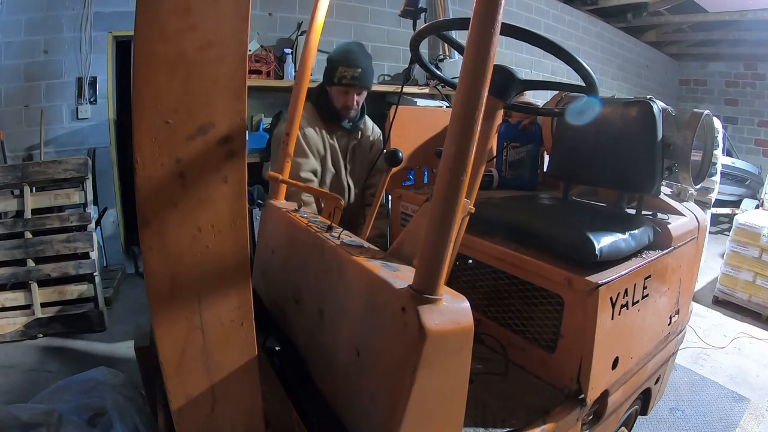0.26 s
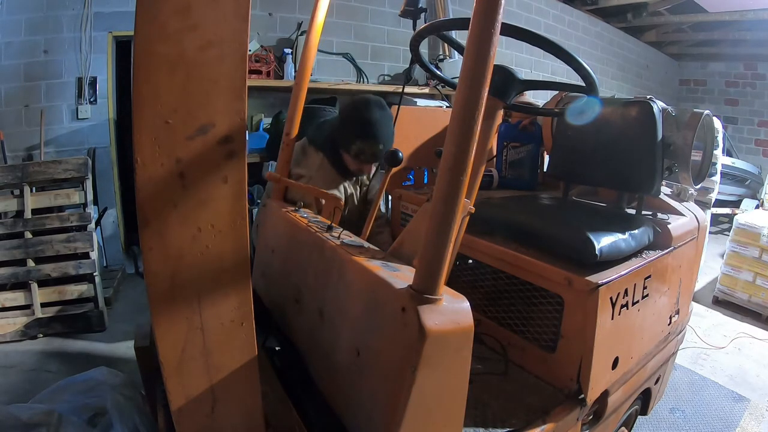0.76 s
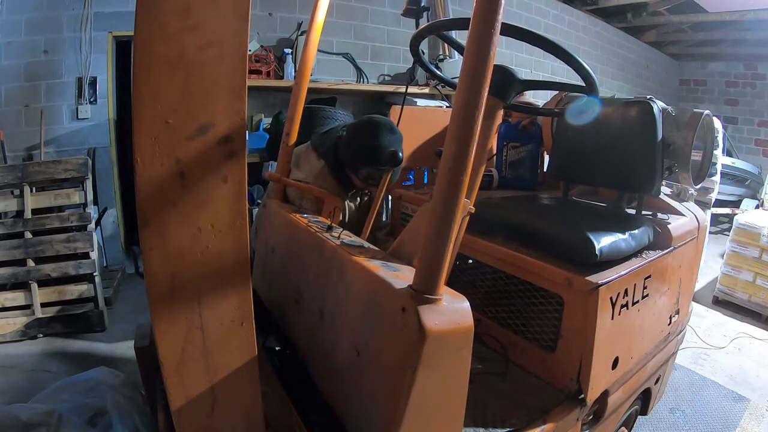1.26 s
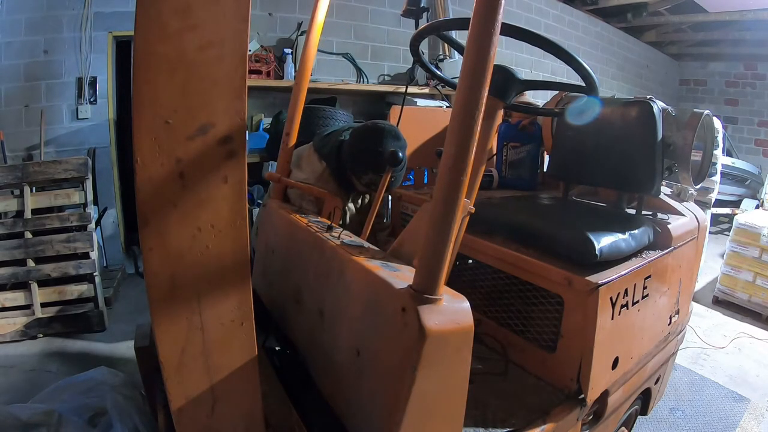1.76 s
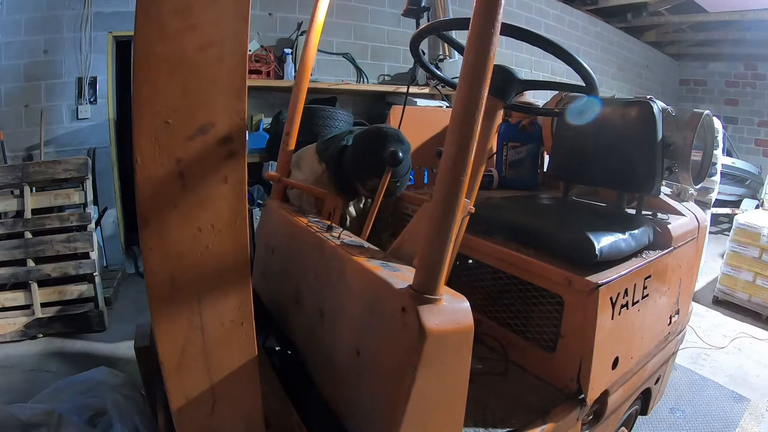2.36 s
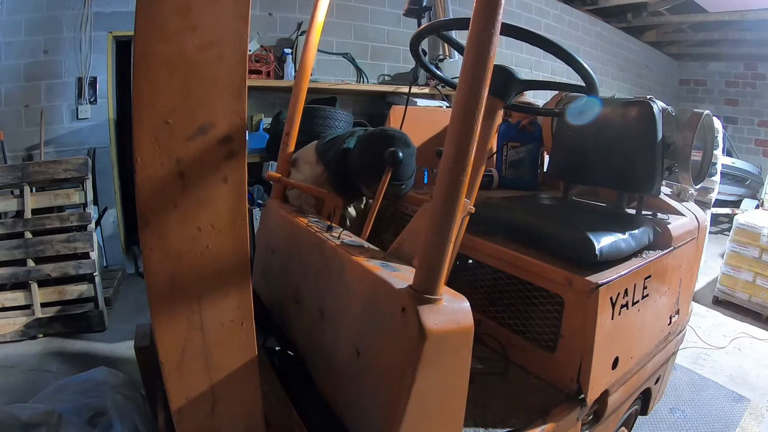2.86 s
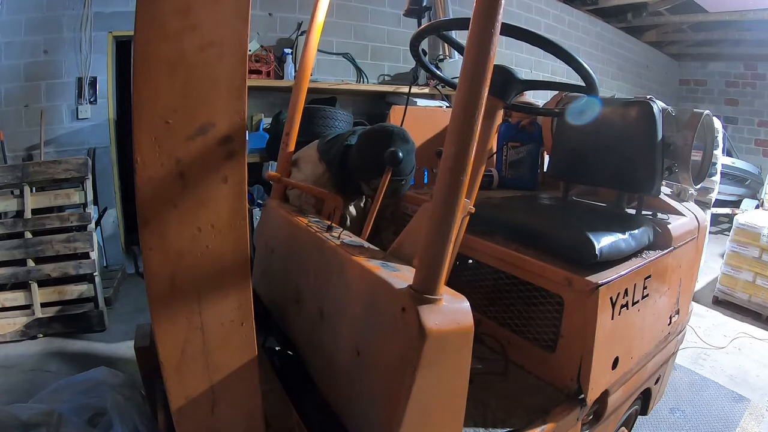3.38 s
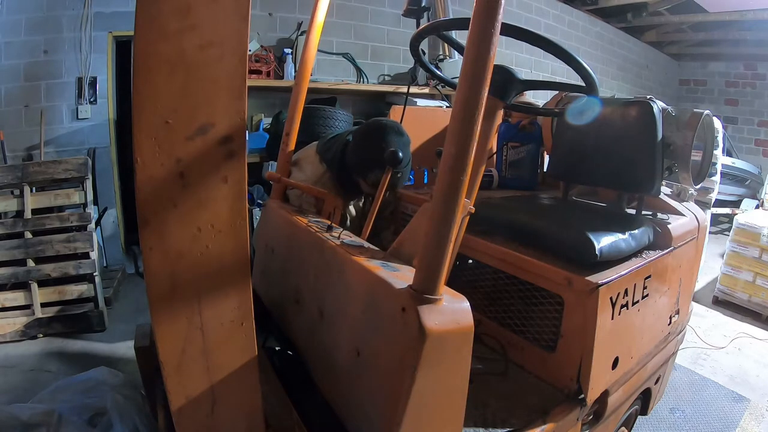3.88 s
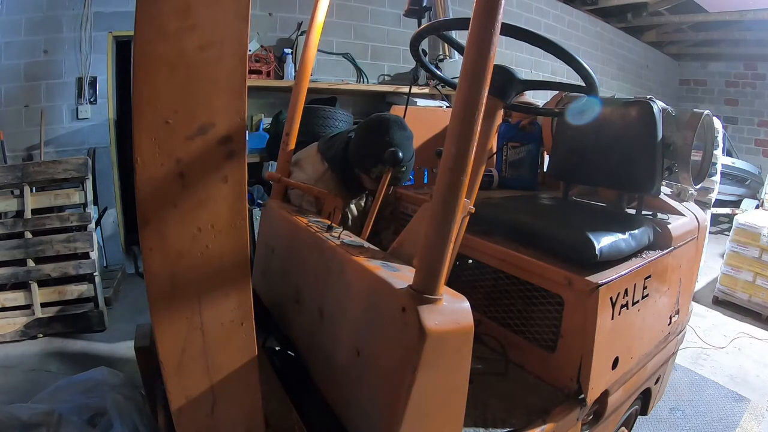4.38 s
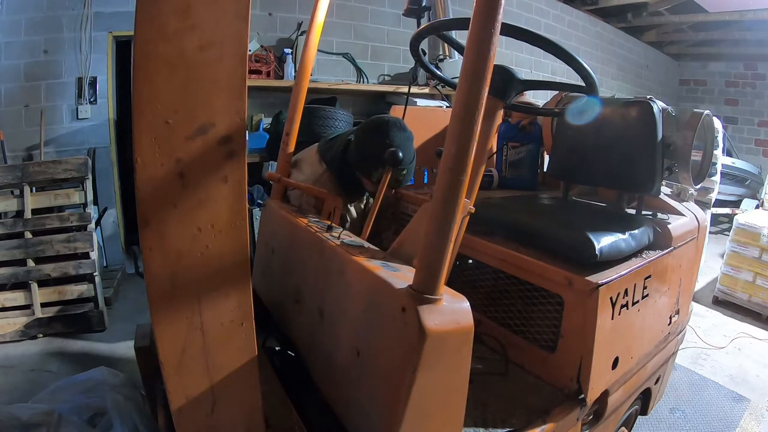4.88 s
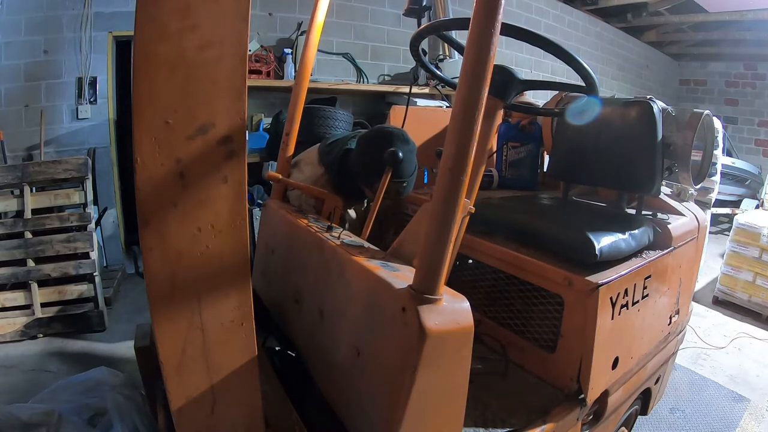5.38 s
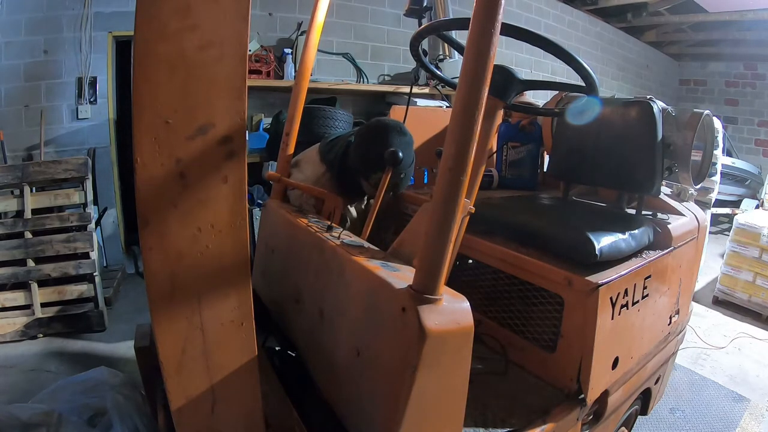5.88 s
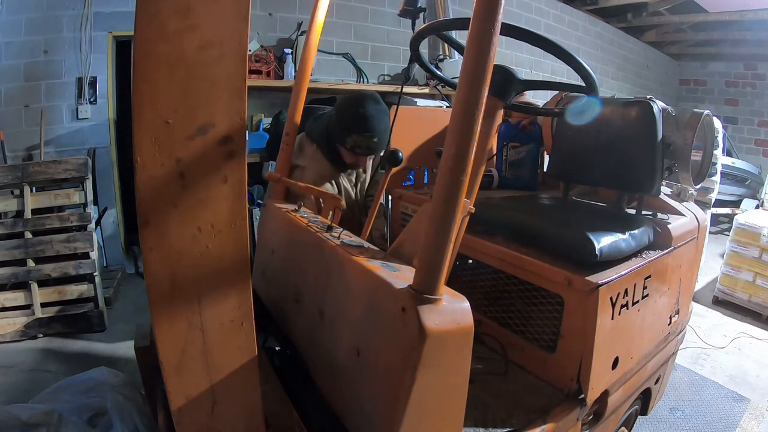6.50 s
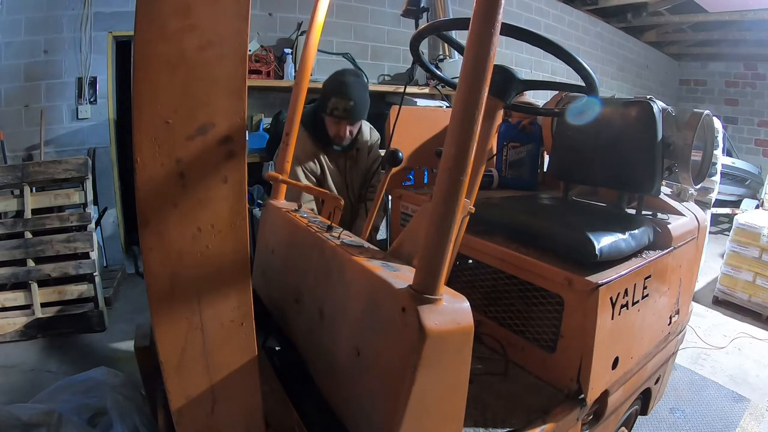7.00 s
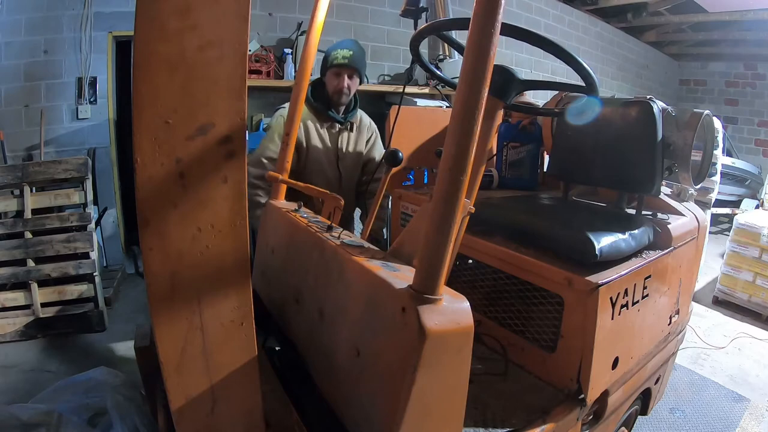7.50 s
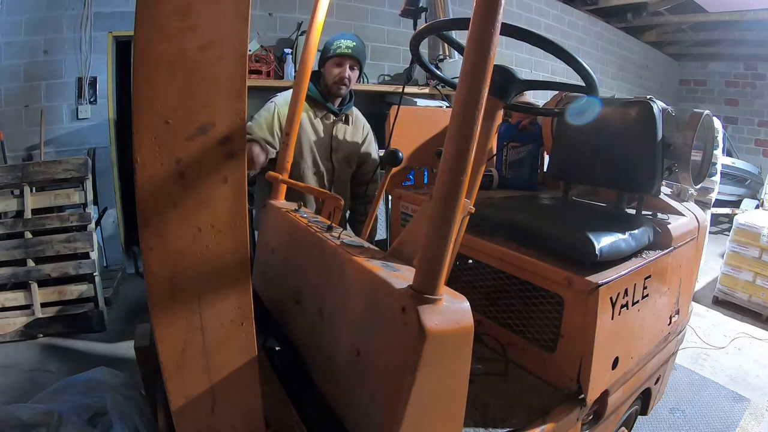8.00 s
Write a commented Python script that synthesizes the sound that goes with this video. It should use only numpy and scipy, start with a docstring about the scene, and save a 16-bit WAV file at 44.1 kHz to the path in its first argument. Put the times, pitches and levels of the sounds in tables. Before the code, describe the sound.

In a quiet block-walled shop, a heavy jacket rustles and boots shuffle with light knocks. A hard metallic clunk starts a bright starter whine that spins free, then glides down buzzing to a stop. A second clunk brings a coarse grind; the engine catches with a loud flare, then settles to a deep booming idle with clatter and ticking. Close stereo microphone, slight room tail.

```python
"""An old four-cylinder forklift engine is started in a block-walled shop, after a rustle of work clothes.
On the first key the starter spins free and coasts down: whining harmonics, humming orders, coloured noise.
On the second it grinds on the ring gear; the engine catches and settles into a booming idle with a
clatter on every turn: firings ring the pipe resonances, crank orders boom, noise bursts and tuned modes
make the clatter and valve ticks."""
import sys
import numpy as np
from scipy import signal
from scipy.fft import rfft, irfft, next_fast_len
from scipy.io import wavfile

SR = 44100
rng = np.random.default_rng(int(sys.argv[2]) if len(sys.argv) > 2 else 0)


def to_wav(s):
    """Save 16-bit WAV."""
    ch = np.atleast_2d(s).T  # columns
    pcm = np.round(np.clip(ch, -1, 1) * 32767)  # PCM
    wavfile.write(sys.argv[1], SR, pcm.astype(np.int16))


N = 363825
TIME = np.arange(N) / SR


def from_db(db):
    """Decibels to gain."""
    return 10 ** (np.asarray(db) / 20)


def rms_one(x):
    """Scale to unit power."""
    return x / np.sqrt(np.mean(x ** 2) + 1e-20)


def in_time(rows):
    """Each column of a curve, interpolated at every sample."""
    s, *columns = np.transpose(rows)
    return [np.interp(TIME, s, c) for c in columns]


def at_hz(points, hz, axis=1):
    """One column of a spectrum, read on a log-frequency axis."""
    points = np.array(points)
    return np.interp(np.log(hz), np.log(points[:, 0]), points[:, axis])


def drift(rate_hz):
    """Smooth random wander of spread 1: two-pole low-passed noise, drawn every 40 samples."""
    pole = np.exp(-80 * np.pi * rate_hz / SR)
    slow = signal.lfilter([1], [1, -2 * pole, pole * pole], rng.standard_normal(N // 40 + 2002))[2000:]
    return np.interp(np.arange(N) / 40, np.arange(len(slow)), rms_one(slow))


def since(s):
    """Time gone by since a moment, zero before it."""
    return np.maximum(TIME - s, 0)


def settle(s, lag_s):
    """Exponential rise from 0 towards 1, beginning at a moment."""
    return 1 - np.exp(-since(s) / lag_s)


def held(start_s, end_s, attack_s, release_s):
    """Envelope of attack, hold and release, both slopes as time constants."""
    return settle(start_s, attack_s) * np.exp(-since(end_s) / release_s)


def swells(rows, attack_s, release_s, column=2):
    """Power sum of envelopes of (start_s, length_s, level_db, ..) rows, for one level column."""
    power = 0
    for row in rows:
        envelope = held(row[0], row[0] + row[1], attack_s, release_s)
        power = power + (from_db(row[column]) * envelope) ** 2
    return np.sqrt(power)


# microphone pair: freq_hz, likeness (1 = same in both channels), left_minus_right_db
PAIR = [(100, 0.74, 1.5), (250, 1, -1.5), (496, 0.9, -1), (1030, 0.35, -5), (2010, 0.6, -3),
        (3840, 0.87, -1), (8000, 0, -1)]


def spread(mid, side, hz):
    """Direct and diffuse sound as the two microphones hear them at a frequency."""
    alike = np.clip(at_hz(PAIR, hz), -.999, .999)
    pan_db = at_hz(PAIR, hz, axis=2)
    sign = np.array([[1], [-1]])
    return (np.sqrt(1 + alike) * mid + sign * np.sqrt(1 - alike) * side) * from_db(sign * pan_db / 2)


def noise(spectrum, tilt_db=0, size=N, panels=0.0, panel_t60_s=0.14):
    """Stereo coloured noise, unit power; a share of it rings in the crowded modes of steel panels."""
    padded = next_fast_len(size, True)
    hz = np.maximum(np.arange(padded // 2 + 1) * SR / padded, 1)
    low_skirt = np.minimum(hz / spectrum[0][0], 1) ** 3
    colour = low_skirt * from_db(at_hz(spectrum, hz) + tilt_db * np.log2(hz / hz[-1]))
    # the spectrum of a decaying noise burst stands for the dense modes
    age = TIME[:SR // 4]
    decaying = rng.standard_normal(len(age)) * from_db(-60 * age / panel_t60_s)
    modes = rms_one(np.abs(rfft(decaying, padded)))
    share = np.clip(panels, 0, 1) * np.interp(hz, [0, 1000, 4000, 8000], [0, 1, 1, .35])
    colour *= np.sqrt(1 - share + share * modes ** 2)
    mid, side = rfft(rng.standard_normal((2, padded)))
    return rms_one(irfft(spread(mid, side, hz) * colour, padded)[:, :size])


def ring(clicks, hz, t60_s):
    """Two-pole resonator: a unit click sets a sine of height 1 ringing."""
    r, w = 1e-3 ** (1 / (t60_s * SR)), 2 * np.pi * hz / SR
    return signal.lfilter([0, np.sin(w)], [1, -2 * r * np.cos(w), r * r], clicks + 1e-18)


def passes(phase):
    """Samples at which a phase completes a whole cycle."""
    return np.flatnonzero(np.diff(np.floor(phase)) > 0)


def clicks_at(at, sizes):
    """A train of single clicks."""
    out = np.zeros(N)
    out[at] = sizes
    return out


def shop(x, t60_s=.45, wet_db=-6.0):
    """Direct sound plus a diffuse tail off the block walls, different in each channel."""
    age = TIME[:SR // 2]
    tail = rng.standard_normal((2, len(age))) * from_db(-60 * age / t60_s)
    tail *= from_db(wet_db) / np.sqrt(np.sum(tail[0] ** 2))
    wet = signal.fftconvolve(np.atleast_2d(x), tail, axes=1)[:, :N]
    return (x + wet) / np.sqrt(1 + from_db(2 * wet_db))


# background spectrum: freq_hz, level_db
SHOP = [(25, -17), (64, -22.5), (95, -10.5), (120, -23.5), (160, 2), (293, -16), (588, -19.5), (820, -8),
        (1080, -22), (4620, -32.5), (15000, -50.5)]


def shop_hush(level_db=-67.5):
    """Steady coloured noise is the quiet of the shop."""
    return from_db(level_db) * noise(SHOP)


# spectrum of a blow on the frame: freq_hz, level_db
BLOW_COLOUR = [(80, -35.5), (170, 1), (400, -4), (700, 1.5), (1400, -3), (2200, -4), (3300, -6.5),
               (4500, -14.5), (8500, -16), (10500, -28), (12000, -46)]
# starter housing modes: freq_hz, level_db, t60_s
HOUSING = [(410, -13, 0.44), (561, -2.5, 0.087), (602, -5, 0.43), (726, -1.5, 0.23), (957, -7.5, 0.42),
           (2030, 2, 0.038), (3110, -8.5, 0.16)]


def blows(table, attack_s=.0013):
    """Each blow rattles the whole frame, treble dying first, and rings the starter housing."""
    out, age = np.zeros((2, N)), TIME[:SR // 2]
    lowpass = signal.butter(1, 1500, fs=SR, output="sos")
    for start_s, level_db, tilt_db, t60_s, ring_db in table:
        burst = noise(BLOW_COLOUR, tilt_db, size=len(age))
        low = signal.sosfilt(lowpass, burst)
        body = low * from_db(-60 * age / (1.16 * t60_s))
        body += (burst - low) * from_db(-60 * age / (0.73 * t60_s))
        for hz, mode_db, mode_t60_s in HOUSING:
            # nearly the same phase in both channels
            cycles = hz * age + rng.random() + 0.24 * rng.random((2, 1))
            body += np.sin(2 * np.pi * cycles) * from_db(ring_db + mode_db - 60 * age / mode_t60_s)
        at = round(start_s * SR)
        out[:, at:at + len(age)] += from_db(level_db) * body * (1 - np.exp(-age / attack_s))
    return out


# jacket spectrum: freq_hz, level_db
CLOTH = [(210, -28), (350, -5.5), (592, -5.5), (1540, -2), (7550, -13.5), (9520, -14.5), (12500, -42)]
# boot spectrum: freq_hz, level_db
SHUFFLE = [(90, -45), (150, 3.5), (240, 7.5), (400, -3), (700, -52)]
# driver's movements: start_s, length_s, jacket_db, boots_db (before boots_trim_db)
MOVES = [(0, 0.17, -57, -67), (.22, 0.18, -61.5, -63), (.35, 0.11, -56.5, -55), (.44, 0.18, -53, -61),
         (.66, 0.18, -55, -56.5), (.82, 0.28, -60, -57), (1.04, .06, -64.5, -66), (1.21, 0.24, -62.5, -70),
         (1.5, 0.1, -68.5, -73), (1.635, 0.02, -65, -61), (1.82, 0.34, -72, -76), (2.2, 0.7, -75.5, -73)]
# light knocks on the frame: start_s, level_db, tilt_db_per_octave, t60_s (nominal), housing_ring_db
KNOCKS = [(.456, -44.5, 0, 0.12, -27), (.832, -55, -7, 0.24, -20), (5.225, -62, -9, 0.116, -27)]


def driver(attack_s=0.011, release_s=0.096, crinkle_db=1.0, boots_trim_db=-4.0):
    """A heavy jacket rubs and crinkles and boots shuffle as the driver bends to the key; light knocks."""
    crinkle = from_db(drift(20) + crinkle_db * drift(150))
    cloth = swells(MOVES, attack_s, release_s) * crinkle * noise(CLOTH)
    steps = swells(MOVES, attack_s=0.0049, release_s=0.023, column=3)
    shuffle = steps * from_db(boots_trim_db + 2 * drift(46)) * noise(SHUFFLE)
    return cloth + shuffle + blows(KNOCKS)


# relay and solenoid: start_s, level_db, tilt_db_per_octave, t60_s (nominal), housing_ring_db
CLUNKS = [(2.688, -39.5, 0, 1, -5), (2.727, -24.5, 1.5, 0.25, -1), (2.844, -22.5, -2, 0.19, -0.5),
          (2.857, -15.5, -1, 0.42, -8.5), (4.235, -41, 6, 0.22, -12), (5.323, -32.5, 1, 1, -8),
          (5.346, -24, 0, 0.95, -0.5), (5.368, -15, -1.5, 0.24, -12)]


def relay_and_solenoid():
    """Relay and solenoid strike the frame and housing."""
    return blows(CLUNKS)


ROTOR_TOP_HZ, ROTOR_KICK = 84, .45   # kick: share of top speed gained at once
SPIN_UP_S, COAST_S, COAST_SHAPE = .2, 1.45, 1.24   # time constant, time to standstill, exponent


def rotor_speed(on_s, off_s):
    """Share of top speed: the starter jumps into motion, runs up under power, then friction brakes it."""
    powered_s = since(on_s) - since(off_s)
    powered = 1 - (1 - ROTOR_KICK) * np.exp(-powered_s / SPIN_UP_S)
    return powered * np.maximum(1 - (since(off_s) / COAST_S) ** COAST_SHAPE, 1e-4)


# how the starter housing passes its tones: freq_hz, gain_db
RADIATION = [(250, 12), (500, -3), (1350, 5), (1550, -10), (2500, 4), (3400, 2.5), (4000, -10), (6000, -21)]


def gear_tone(hz, partials_db, wobble, flutter_db):
    """Harmonics of a tooth rate, each fluttering and coloured by the housing."""
    phase = 2 * np.pi * np.cumsum(hz * (1 + wobble * drift(39))) / SR
    tone = 0
    for k, db in enumerate(partials_db, 1):
        level_db = db + at_hz(RADIATION, k * hz) + flutter_db * drift(38)
        tone = tone + from_db(level_db) * np.sin(k * phase)
    return tone


MOUNT_HZ = 264.2


def mount_hum(t60_s=0.32):
    """The starter mount, shaken at random, hums at its own pitch; unit power."""
    return rms_one(ring(rng.standard_normal(N), MOUNT_HZ, t60_s))


# first turn of the key: on_s, off_s
FREE_KEY = (2.85, 3.36)
COMMUTATOR_BARS = 23
# housing resonances the whine climbs through: freq_hz, width_hz, lift_db
WHINE_PEAKS = [(1708, 110, 16.5), (1800, 120, 6.5), (1480, 150, 9)]
# commutator buzz while coasting, one row a harmonic: level_db
BUZZ = [0, 1.5, 1, 0, -1]
# rotor hum: order (multiple of rotor speed), level_db
ROTOR = [(2, -2), (3, -2.5), (4, -5.5), (6, -9), (7, -10.5), (8, -14.5), (9, -8.5)]


def starter_tones(speed, power, whine_db=-47.0, coast_db=-55.0, drive_db=-46.5, hum_db=-44.0,
                  hum_lift_db=2.5, mount_db=-52.0, mount_fade=0.34):
    """The commutator whines, pure under power and buzzy when coasting; the rotor hums on its mount."""
    on_s, off_s = FREE_KEY
    rotor_hz = ROTOR_TOP_HZ * speed
    rotor = 2 * np.pi * np.cumsum(rotor_hz) / SR
    whine_hz = COMMUTATOR_BARS * rotor_hz
    lift_db = sum(db / (1 + (2 * (whine_hz - hz) / width) ** 2) for hz, width, db in WHINE_PEAKS)
    whine = np.sin(COMMUTATOR_BARS * rotor + .5 * drift(30))
    whine *= held(on_s, off_s, .01, 0.069) * from_db(whine_db + lift_db + drift(38))
    # the drive gear adds a rough tone a little above the whine
    gear = power * from_db(drive_db + 3 * drift(40)) * np.sin(28 * rotor + 1.5 * drift(60))
    # unloaded, the rotor wobbles in its bearings and splits each partial into a cluster
    wobble = 1 + .6 * (np.sin(rotor + drift(10)) + np.sin(2 * rotor + drift(10)))
    buzz_gain = (1 - power) * from_db(coast_db) / (1 + (0.35 / speed) ** 4)
    buzz = buzz_gain * wobble * gear_tone(whine_hz, BUZZ, wobble=0.006, flutter_db=3.5)
    # each order swells as it glides past the mount's pitch; the small motor radiates little bass
    hum = 0
    for order, db in ROTOR:
        hz = order * rotor_hz
        swell_db = hum_lift_db / (1 + ((hz - MOUNT_HZ) / 80) ** 2)
        bass_cut = 1 + (145 / hz) ** 4
        hum = hum + from_db(db + swell_db + 3 * drift(8)) * np.sin(order * rotor) / bass_cut
    mount = from_db(mount_db) * speed / np.hypot(speed, mount_fade) * mount_hum()
    shaking = from_db(hum_db) * speed * hum + mount
    clear = shop((whine + gear + shaking) * settle(on_s, 0.026), t60_s=0.25, wet_db=-14.5)
    return clear + shop(buzz * (TIME > off_s), t60_s=.2, wet_db=-6)


# starter gear noise: freq_hz, level_db
STARTER_GEARS = [(88, -30), (150, -5), (192, -14.5), (265, -3.5), (468, -4.5), (600, -2), (1410, -7.5),
                 (1740, -8), (2290, -3), (2700, -8.5), (3190, -9.5), (4750, -19.5), (9050, -23),
                 (14000, -66)]
# brush hiss: freq_hz, level_db
BRUSHES = [(880, -35), (1500, -12.5), (1970, -23), (2200, -4.5), (2890, -20.5), (3210, -3), (3910, -9),
           (5240, -0.5), (6960, -7.5), (8880, -6.5), (11000, -24), (15500, -44)]
# dry bearing of the rotor: freq_hz, level_db
BEARING = [(1200, -18), (1700, 2), (2300, -5.5), (3400, -7.5), (7000, -35.5)]
PINION_BACK_S = 3.52   # the pinion drops back a moment after the key is let go


def free_starter(gear_db=-41.0, gear_growth=0.78, power_db=6.0, pinion_db=6.5, brush_db=-42.5,
                 brush_dip_db=-9.0, brush_fade=0.5, bearing_db=-47.5):
    """Gears grind hardest with current on and pinion out; brushes hiss and a dry bearing rubs to the stop."""
    on_s, off_s = FREE_KEY
    speed = rotor_speed(on_s, off_s)
    power = held(on_s, off_s, .01, 0.017)
    pinion = held(on_s, PINION_BACK_S, .01, 0.0044)
    gear_level = from_db(gear_db + power_db * power + pinion_db * pinion) * speed ** gear_growth
    gears = gear_level * noise(STARTER_GEARS, panels=0.82)
    brush_level = from_db(brush_db + brush_dip_db * (power + pinion) / 2)
    brush_level /= np.sqrt(1 + (brush_fade / speed) ** 4)
    brushes = brush_level * noise(BRUSHES, panels=0.98)
    # the unbalanced rotor makes the noise throb once a turn
    rotor = 2 * np.pi * np.cumsum(ROTOR_TOP_HZ * speed) / SR
    throb = from_db(0.54 * np.sin(rotor) + 0.64 * drift(60))
    bearing = from_db(bearing_db) * np.sqrt(speed) * noise(BEARING, panels=0.86)
    spinning = throb * held(on_s, off_s + COAST_S, 0.012, 0.022)
    rubbing = shop(bearing * spinning, t60_s=.3, wet_db=-4.5)
    return starter_tones(speed, power) + (gears + brushes) * spinning + rubbing


# rotor running through frame resonances: start_s, length_s, level_db
SHUDDERS = [(2.89, 0.095, -23.5), (3.53, 0.025, -42.5), (3.95, 0.039, -30)]
FRAME_HZ = 112


def frame_shudder(rumble_db=-15.5):
    """The frame hums near its own pitch and rumbles a little under the spinning rotor."""
    hum = np.sin(2 * np.pi * np.cumsum(FRAME_HZ + 2.0 * drift(2.3)) / SR)
    rumble = from_db(rumble_db) * noise([(40, -5.5), (110, 0.5), (200, -57.0)])
    return swells(SHUDDERS, attack_s=0.042, release_s=0.066) * (hum + rumble)


# crankshaft, turns per second: on the starter, just after catching, at fast idle
CRANKING_SPEED, CAUGHT_SPEED, IDLE_SPEED = 3.44, 13.314, 16.819
TURN_OVER_S = 5.37
CATCH_S, CATCH_LAG_S, PICK_UP_S, PICK_UP_LAG_S = 5.612, .107, 6.34, .603   # lags: time constants


def crank_speed():
    """Turns per second: slow on the starter, a leap as the engine catches, a slow climb to fast idle."""
    leap = (CAUGHT_SPEED - CRANKING_SPEED) * settle(CATCH_S, CATCH_LAG_S)
    climb = (IDLE_SPEED - CAUGHT_SPEED) * settle(PICK_UP_S, PICK_UP_LAG_S)
    return CRANKING_SPEED * (TIME > TURN_OVER_S) + leap + climb


def running(speed, steepness=3.8):
    """Gain growing with crank speed: faint while cranking, full once the engine has caught."""
    return np.minimum(speed / (0.75 * CAUGHT_SPEED), 1) ** steepness


# second turn of the key: on_s, off_s
START_KEY = (5.36, 5.99)
# pinion on the ring gear: freq_hz, level_db
GRIND = [(150, -25), (280, -10), (750, -1.5), (1200, -6), (1400, -9), (1750, -2), (2400, -4), (3100, -7),
         (3700, -17), (9050, -28), (14000, -71)]
# one-way clutch overrun by the engine: freq_hz, level_db
OVERRUN = [(1200, -9), (1700, -8), (2320, 0), (3200, -9), (4200, -18), (12000, -57)]


def loaded_starter(turns, speed, gear_db=-24.0, race_db=-2.5, bite_s=5.47, slack_db=-11.0,
                   release_s=0.049, teeth=6, mesh_db=-12.0, mount_db=-12.5, clutch_db=-26.0):
    """The pinion takes up slack and grinds, slowing at each compression; once caught, its clutch rasps."""
    on_s, off_s = START_KEY
    caught = running(speed)
    sag = .09 * (1 - caught) * np.cos(2 * np.pi * (2 * turns - .15))
    mesh_hz = teeth * ROTOR_TOP_HZ * rotor_speed(on_s, off_s) * (1 + sag)
    mesh = (1 - caught / 2) * gear_tone(mesh_hz, np.zeros(6), wobble=.028, flutter_db=3.0)
    # the teeth chatter in coarse, uneven bursts
    chatter = rms_one(from_db(1.5 * drift(35) + 3 * drift(160)))
    grind = chatter * noise(GRIND, panels=1.0) + from_db(mount_db) * mount_hum()
    level = from_db(gear_db + race_db * caught + slack_db * (1 - settle(bite_s, 0.012)))
    level *= held(on_s, off_s, 0.027, release_s)
    clutch_level = from_db(clutch_db) * caught * held(CATCH_S, off_s, CATCH_LAG_S, release_s)
    clutch = clutch_level * chatter * noise(OVERRUN, panels=0.91)
    return level * grind + clutch + shop(level * from_db(mesh_db) * mesh, t60_s=0.13, wet_db=-14.0)


# exhaust pipe and engine cover resonances: freq_hz, width_hz, level_db
PIPE = [(61.4, 18, 5.5), (85.7, 19, 7.5), (112.7, 10.3, -3), (169.2, 11.5, -2), (250, 8, -16),
        (269.5, 9.5, -9), (353, 160, -3)]
# idle boom: order (multiple of crank speed), level_db
BOOM = [(2, -20), (4, -2.5), (5, -25), (6, -13), (7, -17.5), (8, -17), (10, -15), (14, -19)]


def exhaust(turns, speed, pulse_db=-26.0, labour_db=5.5, running_lift_db=1.5, boom_db=-15.0,
            boom_growth=2.0, jitter_s=0.0011, uneven_db=1.0, puff=0.028, puff_t60_s=0.11,
            pipe_lift_db=12.5, thump_db=-11.0, thump_hz=74, thump_t60_s=0.069):
    """Two firings a turn thump the pipe, harder under labour; with speed a steady boom builds up."""
    at = passes(2 * turns)
    chance = rng.standard_normal((len(at), 2))
    late = (jitter_s * SR * chance[:, 1]).astype(int)
    firings = clicks_at(np.clip(at + late, 0, N - 1), from_db(uneven_db * chance[:, 0]))
    # every firing is followed by a turbulent puff of gas
    gas = signal.lfilter([1], [1, -from_db(-60 / (puff_t60_s * SR))], firings)
    drive = firings + puff * (gas + 0.34) * rng.standard_normal(N)
    pipe = 0
    for k, (hz, width_hz, db) in enumerate(PIPE):
        t60_s = np.log(1000) / (np.pi * width_hz)
        pipe = pipe + (-1) ** k * from_db(db) * ring(drive, hz, t60_s)
    pipe = signal.sosfilt(signal.butter(2, 33, "high", fs=SR, output="sos"), pipe)
    labour = np.clip((IDLE_SPEED - speed) / (IDLE_SPEED - CAUGHT_SPEED), 0, 1)
    pipe_db = pulse_db + labour_db * labour + running_lift_db * running(speed, steepness=2.1)
    pipe *= from_db(pipe_db) / np.std(pipe[at[0]:])
    # while the engine labours, each firing also leaves the pipe as one short, deep thump
    thump_band = signal.butter(2, [45, 200], "band", fs=SR)
    thump = ring(signal.lfilter(*thump_band, firings), thump_hz, thump_t60_s)
    pipe += from_db(thump_db) * labour * running(speed, steepness=1.1) * thump
    swing, boom = turns + .006 * drift(8), 0
    for order, db in BOOM:
        # an order swells while it glides past 90 Hz
        lift_db = pipe_lift_db / (1 + ((order * speed - 90) / 6) ** 2)
        tone = np.sin(2 * np.pi * (order * swing + rng.random()))
        boom = boom + from_db(db + lift_db + 1.9 * drift(11.6)) * tone
    boom_level = from_db(boom_db) * (speed / IDLE_SPEED) ** boom_growth
    dry = (pipe + boom_level * boom) * settle(TURN_OVER_S, 0.063)
    # a faint copy, 4 ms late and of opposite sign in the two channels, widens the exhaust
    late_copy = np.pad(dry, (SR // 250, 0))[:N]
    return dry + np.array([[1], [-1]]) * from_db(-20.5) * late_copy


# how hard the engine works, flaring as it catches and picks up: time_s, above_idle_db
EFFORT = [(5.64, 12), (5.78, 16.5), (6.0, 10), (6.3, 4.5), (6.8, 4.5), (7.0, 0), (7.4, -1.5), (8.25, 0.5)]
# fan and gear rush: freq_hz, level_db
GEARS = [(120, -7), (200, -3.5), (304, 3), (430, -4), (630, -5), (1170, -8.5), (1560, -11), (1840, -14),
         (2400, -15.5), (3120, -16), (3960, -25), (8660, -26), (15500, -63)]
# clatter, also the crack of the valve ticks: freq_hz, level_db
CLATTER = [(900, 0), (2000, 13.5), (3200, 2.5), (5000, 4.5), (9000, 8.5), (10200, 2), (11500, -13),
           (15000, -18)]


def mechanics(turns, speed, clatter_db=-40.0, gear_db=-28.5, gear_follows=0.19, clatter_t60_s=0.29,
              rise_s=0.0029, uneven_db=4.0):
    """Fan and gears rush, pulsing twice a turn; a clack a turn rattles the panels, harder with effort."""
    effort_db, = in_time(EFFORT)
    at, age = passes(turns + 0.017), TIME[:SR // 4]
    burst = from_db(-60 * age / clatter_t60_s) * (1 - np.exp(-age / rise_s))
    rattle = rfft(noise(CLATTER, panels=0.71, panel_t60_s=0.16))
    band_edges_hz = [0, *np.geomspace(1700, 9000, 13), SR]
    edges = np.searchsorted(np.arange(rattle.shape[1]) * SR / N, band_edges_hz)
    # each band draws its own strengths, so every clack has a new colour
    clatter = 0
    for low, high in zip(edges, edges[1:]):
        band = irfft(np.pad(rattle[:, low:high], ((0, 0), (low, 0))), N)
        clacks = clicks_at(at, from_db(uneven_db * rng.standard_normal(len(at))))
        clatter = clatter + band * signal.oaconvolve(clacks, burst)[:N]
    pulse_db = 1.1 * np.cos(4 * np.pi * turns) + 1.57 * drift(18.5)
    rush = from_db(gear_db + gear_follows * effort_db + pulse_db) * noise(GEARS, panels=0.69)
    return (from_db(clatter_db + effort_db) * clatter + rush) * running(speed)


# valve gear and loose parts: freq_hz (nominal), level_db, t60_s
TAPPETS = [(1258, 2.5, 0.073), (1583, 7, 0.033), (2040, 7, 0.023), (2257, 4, 0.087), (3120, 6.5, 0.034),
           (3537, 0.5, 0.045), (3783, 0, 0.068), (4130, 0, 0.064), (4400, 2, 0.032), (4820, -4.5, 0.097),
           (5660, -1, 0.066), (6730, -3.5, 0.048)]


def valve_gear(turns, speed, tick_db=-40.5, follows=0.74, between_db=-6.5, crack_db=2.5,
               crack_t60_s=0.033, bounce_db=-4.0):
    """Four valve ticks a turn, one in four hardest; each bounces twice, ringing the parts at new strengths."""
    hz, db, t60_s = np.transpose(TAPPETS)[:, :, None]
    out, cracks, age = np.zeros((2, N + SR)), np.zeros(N + SR), TIME[:SR // 12]
    decay = from_db(db - 60 * age / t60_s) * (1 - np.exp(-age / .001))
    for k, at in enumerate(passes(4 * (turns + 0.0198)), 1):
        pitch, place = rng.standard_normal((2, len(hz), 1))
        phase = 2 * np.pi * hz * (1 + .022 * pitch) * age
        rings = decay * np.sin([phase, phase + place])   # left, right
        for bounce in range(3):
            at += rng.integers(SR // 500, SR // 110)   # 2 to 9 ms
            force_db = between_db * (k % 4 > 0) + bounce_db * bounce + 2 * rng.standard_normal()
            force = from_db(force_db)
            sizes = force * from_db(5 * np.minimum(rng.standard_normal(len(hz)), 1.3))
            out[:, at:at + len(age)] += sizes @ rings
            cracks[at:at + len(age)] += force * from_db(crack_db - 60 * age / crack_t60_s)
    ticks = out[:, :N] + cracks[:N] * noise(CLATTER, panels=0.48)
    return ticks * from_db(tick_db + follows * in_time(EFFORT)[0]) * running(speed)


# rasps as the engine turns over and picks up speed: start_s, length_s, level_db, pitch_hz
RASPS = [(5.479, 0.03, -30, 1720), (5.51, 0.064, -31.5, 3040), (6.52, 0.045, -31, 1400),
         (6.758, 0.064, -31, 1610)]


def rasps(skirt_db=-22.0):
    """Short scrapes, each a noise band around its pitch; perhaps gear teeth and the fan belt slipping."""
    out = 0
    for row in RASPS:
        hz = row[3]
        band = [(.5 * hz, -30), (.8 * hz, skirt_db), (hz, 0), (1.25 * hz, skirt_db),
                (2 * hz, skirt_db), (3 * hz, -40), (15000, -70)]
        half_second = noise(band, size=SR // 2)
        scrape = np.tile(half_second, N // (SR // 2) + 1)[:, :N]
        out = out + swells([row], attack_s=0.0049, release_s=0.014) * scrape
    return out


# tinkles: start_s, level_db, favoured_hz (pitch that rings most)
TINKLES = [(6.038, -20, 2297), (6.076, -28, 2240), (6.155, -21.5, 1980), (6.301, -28.5, 2232),
           (6.596, -29, 1985), (6.664, -27.5, 3780), (6.728, -27, 2235), (6.736, -30.5, 4690),
           (7.18, -27, 1983), (7.311, -27, 2200), (7.673, -31, 2200), (7.976, -29, 3780),
           (8.034, -27, 2300)]
# cover modes: freq_hz, level_db, t60_s
COVER = [(2004, 6, 0.045), (2207, 2, 0.14), (2262.6, 6, 0.15), (3780, 1.5, 0.083), (4690, 1, .09)]


def loose_cover(others_db=-26.5, focus_hz=35):
    """Now and then shaking makes a loose cover tinkle; where it touches decides which mode rings most."""
    start_s, level_db, favoured_hz = np.transpose(TINKLES)
    at, tinkles = (start_s * SR).astype(int), 0
    for hz, mode_db, t60_s in COVER:
        near = np.exp(-((hz - favoured_hz) / focus_hz) ** 2)
        share = np.maximum(near, from_db(others_db + 6.8 * rng.standard_normal(len(at))))
        tinkles = tinkles + ring(clicks_at(at, share * from_db(level_db + mode_db)), hz, t60_s)
    return shop(tinkles, t60_s=0.072, wet_db=-6.0)


def scene():
    """Driver, starter and engine over the quiet of the shop."""
    speed = crank_speed()
    turns = np.cumsum(speed) / SR
    starter = relay_and_solenoid() + free_starter() + frame_shudder() + loaded_starter(turns, speed)
    engine = exhaust(turns, speed) + mechanics(turns, speed) + valve_gear(turns, speed)
    return shop_hush() + driver() + starter + engine + rasps() + loose_cover()


CUTOFF_HZ = 15600


def record(dry):
    """The recorder cuts the top steeply."""
    return signal.sosfilt(signal.ellip(10, .1, 90, CUTOFF_HZ, fs=SR, output="sos"), dry)


dry = scene()
out = record(dry)
to_wav(out)
```